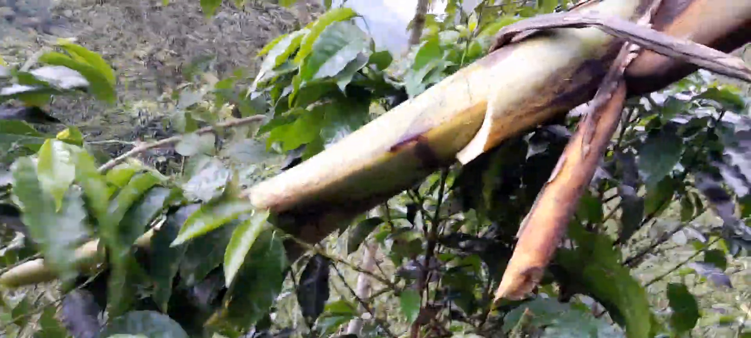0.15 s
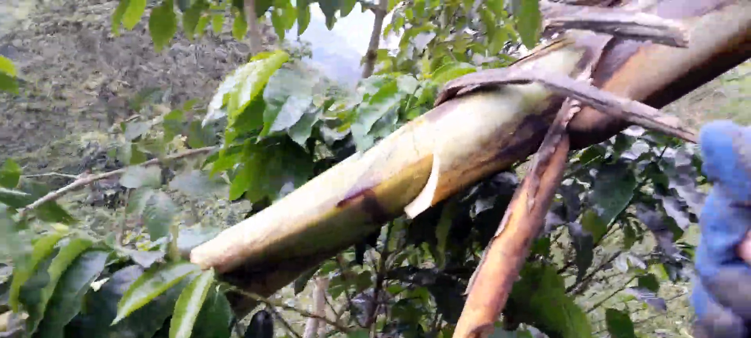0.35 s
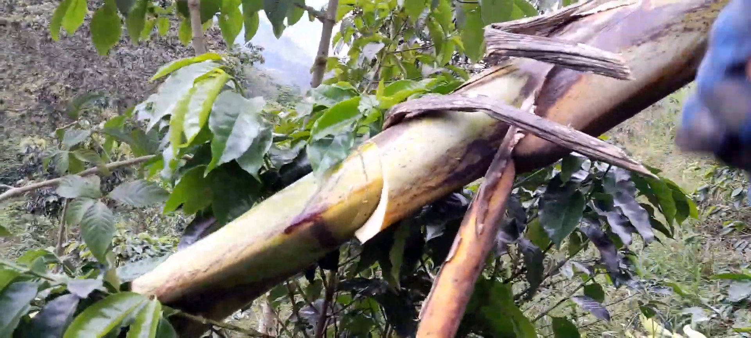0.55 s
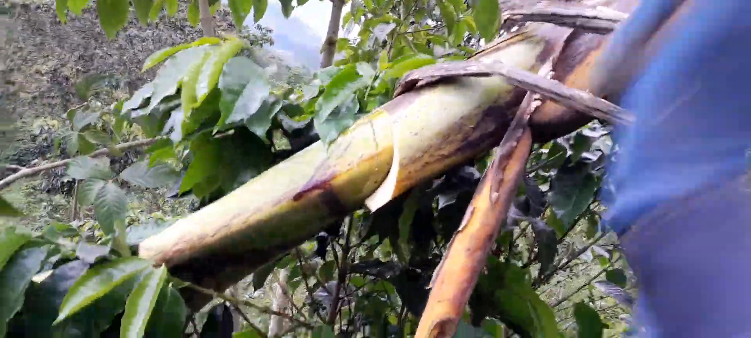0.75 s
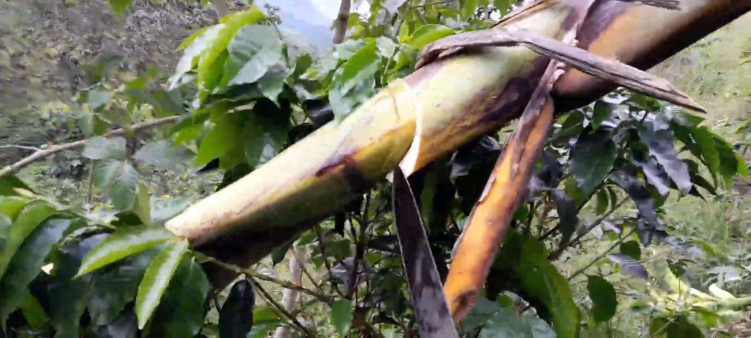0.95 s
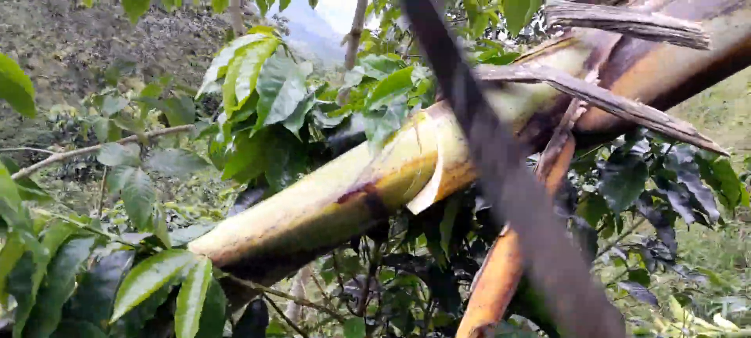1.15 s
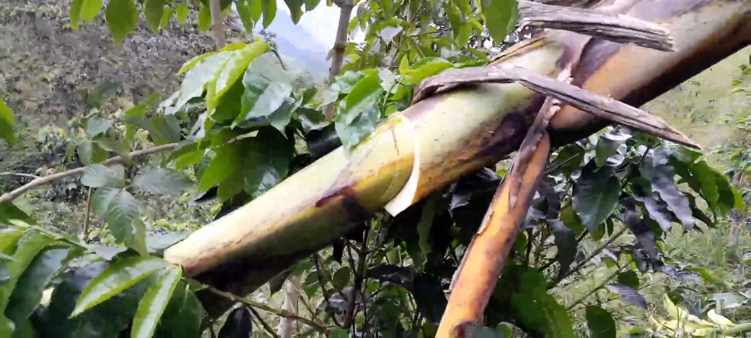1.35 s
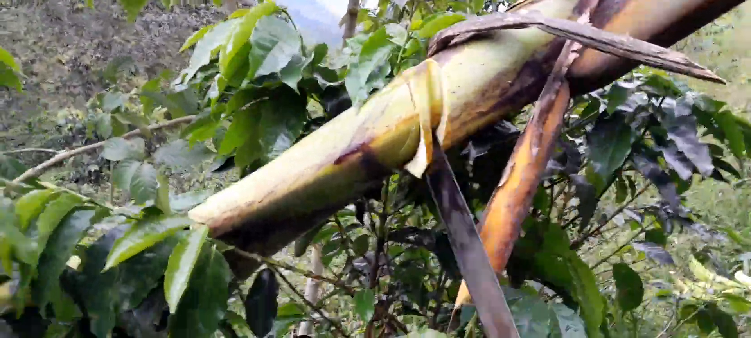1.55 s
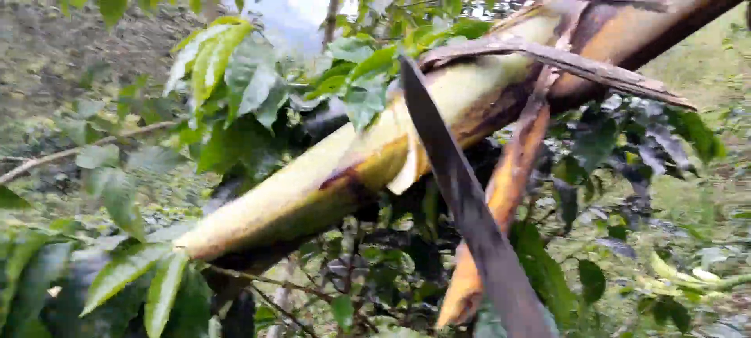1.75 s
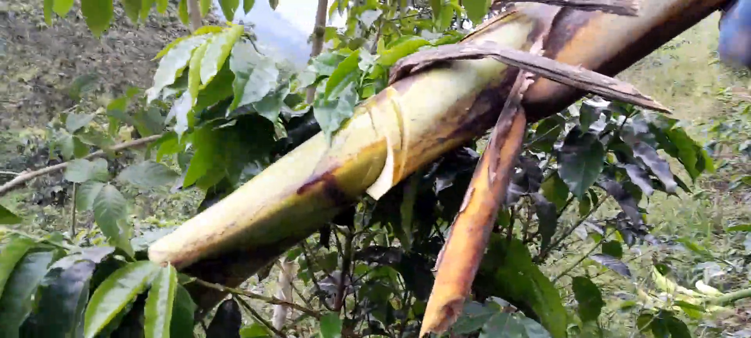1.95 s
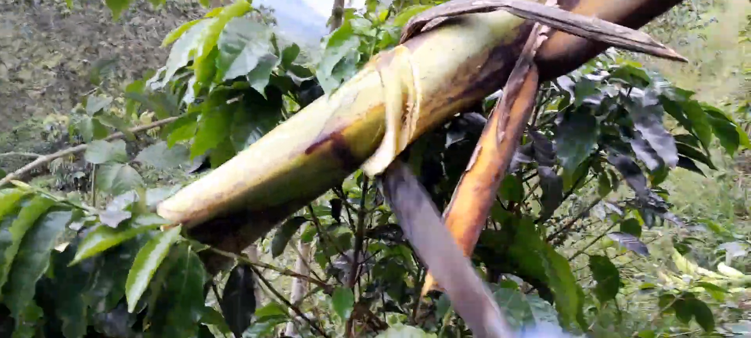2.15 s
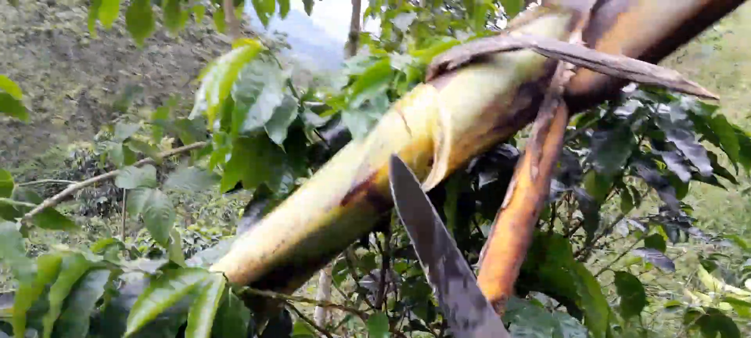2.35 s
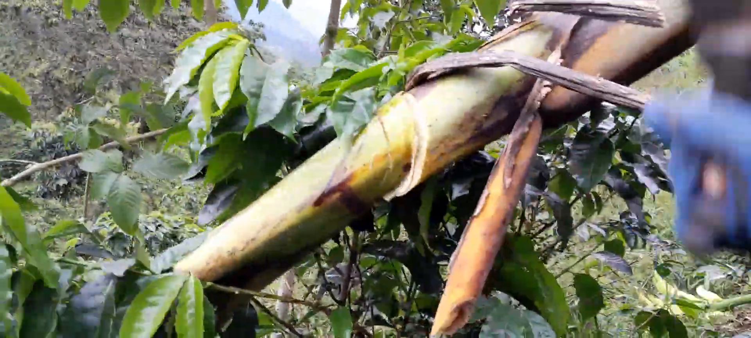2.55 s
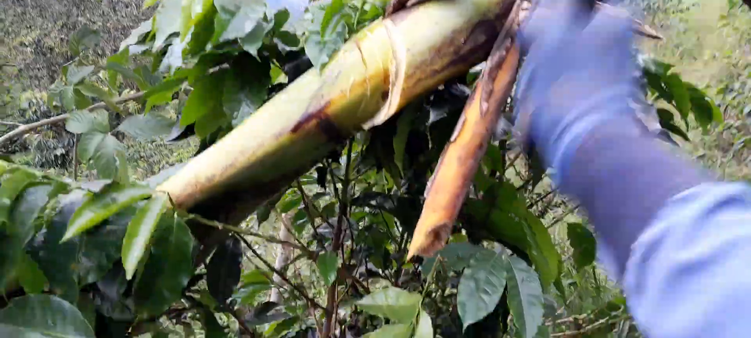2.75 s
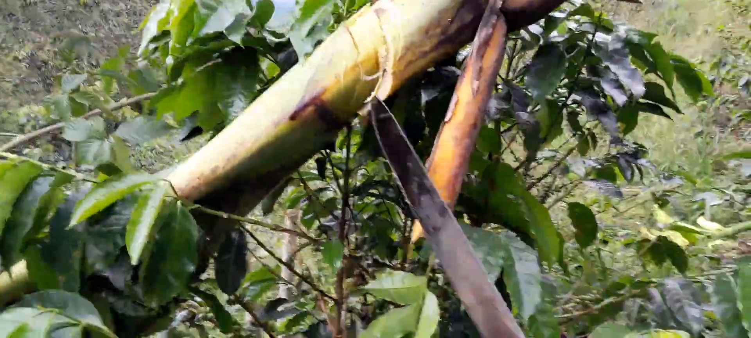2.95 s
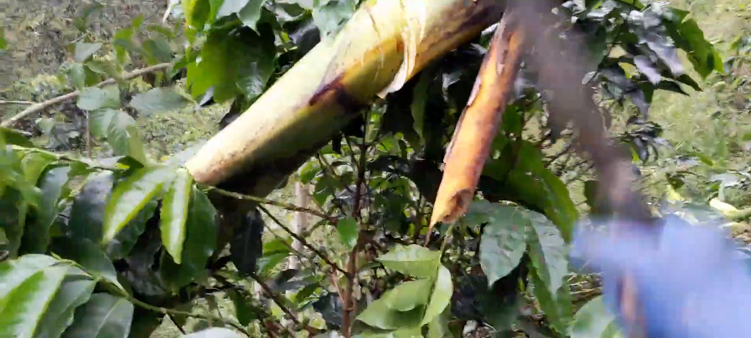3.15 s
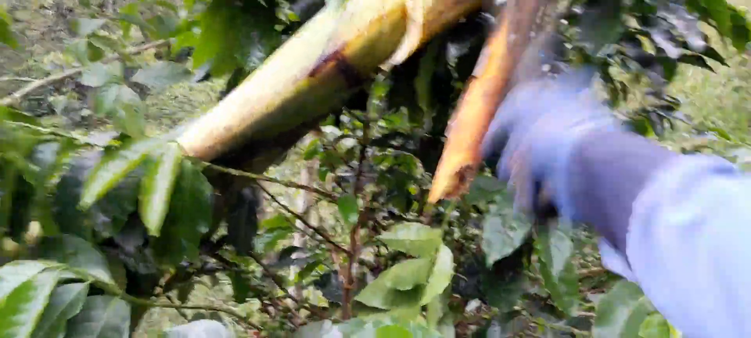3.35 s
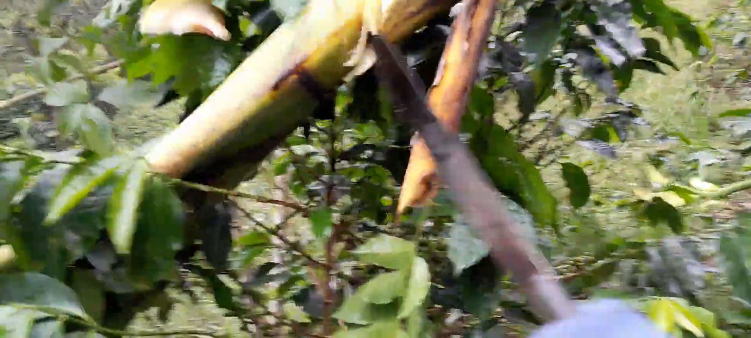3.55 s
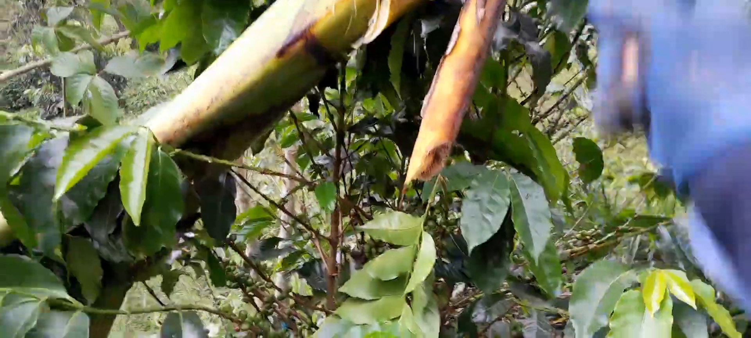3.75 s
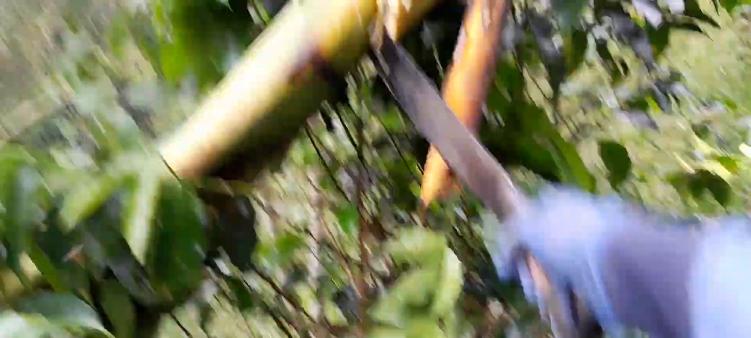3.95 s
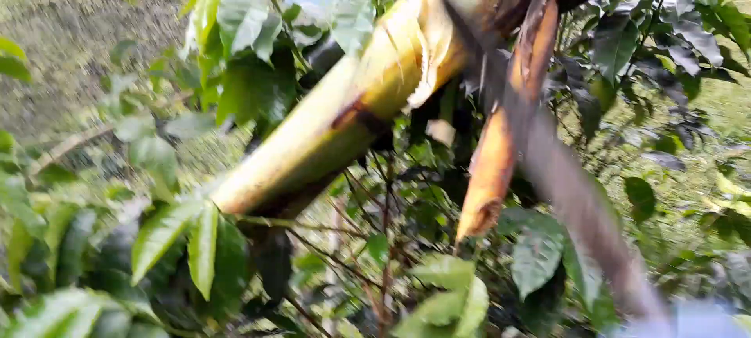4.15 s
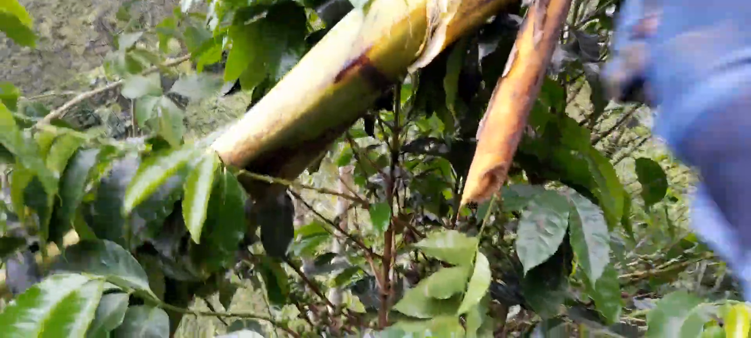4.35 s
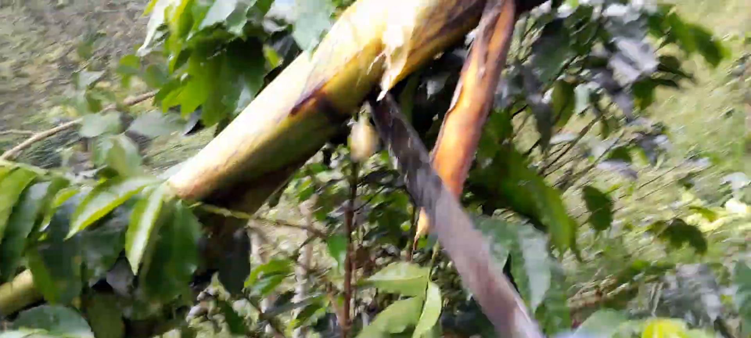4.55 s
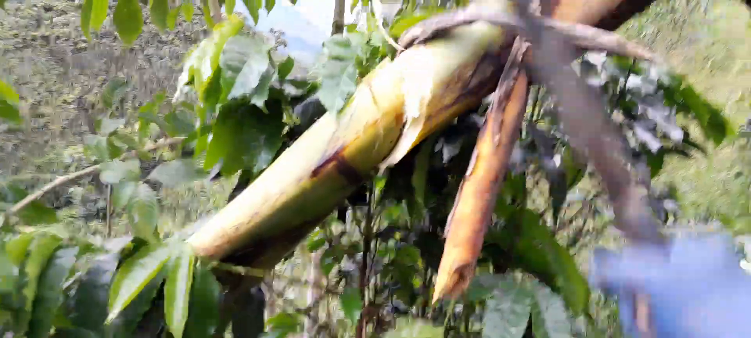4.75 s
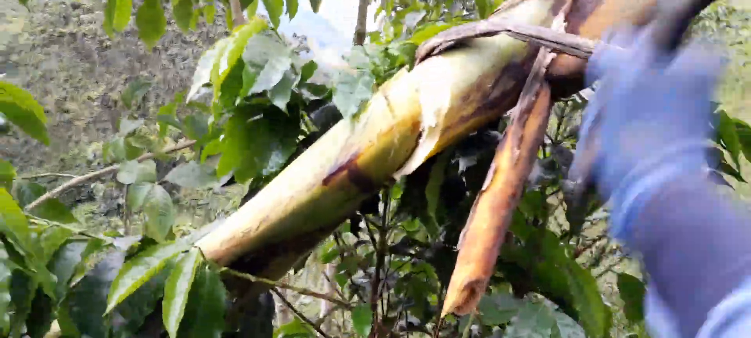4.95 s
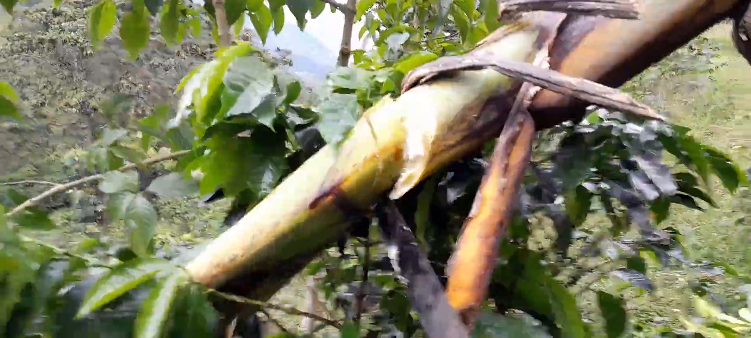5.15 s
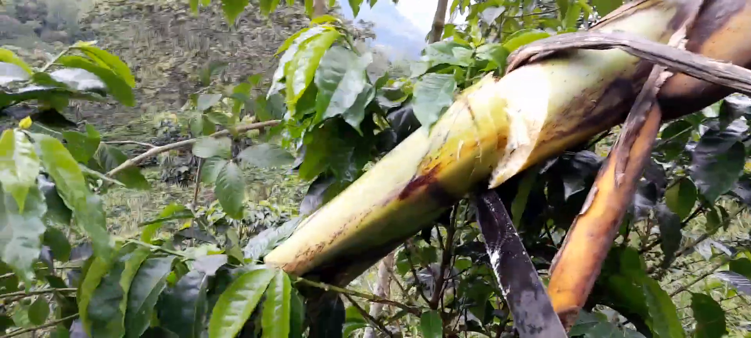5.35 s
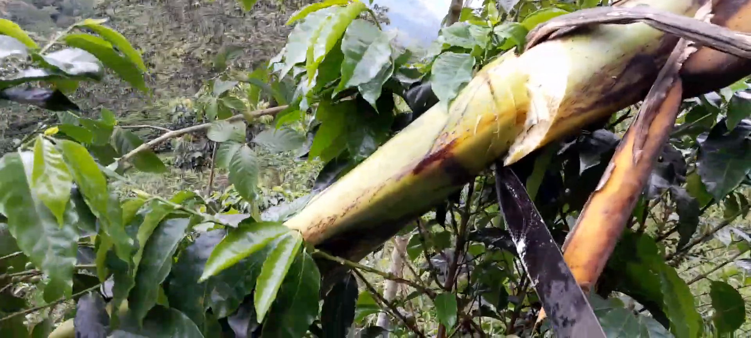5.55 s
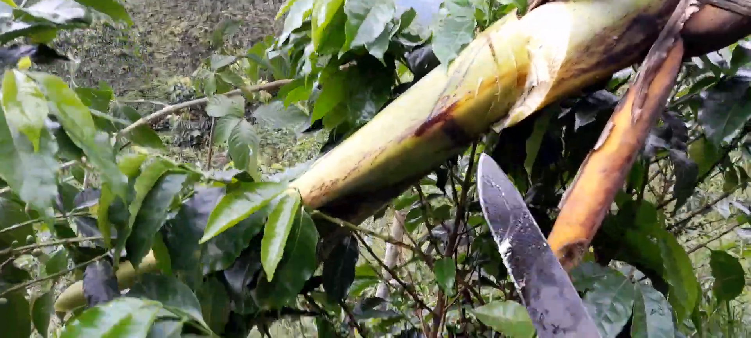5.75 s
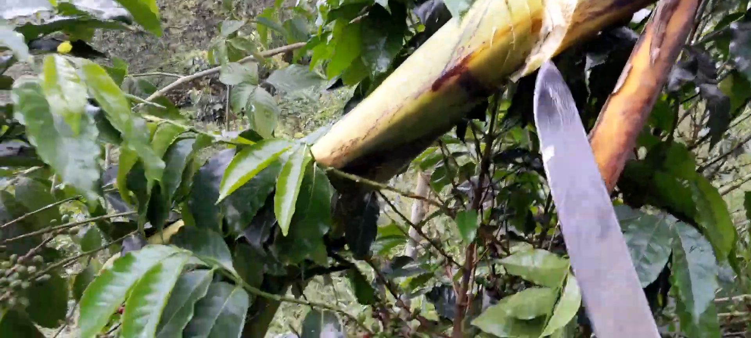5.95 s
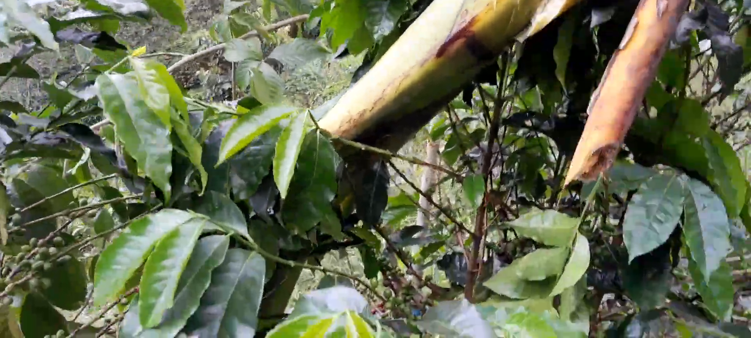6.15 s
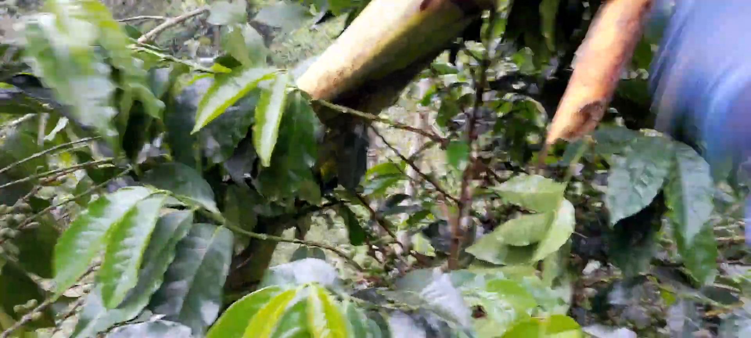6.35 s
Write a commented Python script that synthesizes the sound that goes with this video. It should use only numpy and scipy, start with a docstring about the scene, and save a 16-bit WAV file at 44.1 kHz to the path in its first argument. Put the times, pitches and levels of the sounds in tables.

```python
"""Leafy hillside: a machete chops into the soft, wet trunk of a fallen plant.
Each blow is a short run of tearing noise bursts with resonant tones; fibres snap as damped sines with clicks.
Leaves rustle as ticking hiss, soft thumps swell, some gliding in pitch, and the blade sings once as driven modes.
Behind: wind noise on the microphone ports, a faint hum near 100 Hz with a rough band above, and a far call.
The left port is brighter in leaves and snaps, and lacks bass on near sounds at first.
"""
import sys
import numpy as np
from scipy import signal
from scipy.fft import rfft, irfft
from scipy.io import wavfile
from scipy.ndimage import uniform_filter1d

SR = 44100
rng = np.random.default_rng(int(sys.argv[2]) if len(sys.argv) > 2 else 0)


def unload_wav(signal):
    """Save mono or channel-first audio to the path in sys.argv[1] as 16-bit WAV at rate SR, clipped to [-1, 1]."""
    wavfile.write(
        sys.argv[1],
        SR,
        np.round(np.clip(np.atleast_2d(signal).T, -1, 1) * 32767).astype(np.int16),
    )


N = 282681

LEFT_BASS_CUT_HZ, LEFT_BASS_BACK_S = 270, 4.45   # near sounds on the left port are high-passed until then


def from_db(db):
    """Amplitude gain of a level in dB."""
    return 10 ** (np.asarray(db) / 20)


def rms_one(x):
    """Scale to rms 1."""
    return x / np.sqrt(np.mean(x ** 2) + 1e-20)


def in_time(rows):
    """Curve columns interpolated at every sample; the first column is time in s."""
    time_s, *columns = np.transpose(rows)
    return [np.interp(np.arange(N) / SR, time_s, column) for column in columns]


def at_hz(points, hz):
    """Curve value in dB, interpolated on a log-frequency axis."""
    point_hz, point_db = np.transpose(points)
    return np.interp(np.log(hz), np.log(point_hz), point_db)


def sides(left_right_db):
    """Left and right gains of constant total power."""
    left_power = 1 / (1 + from_db(-2 * left_right_db))
    return np.sqrt(2 * np.array([left_power, 1 - left_power]))


def by_port(pan_db):
    """Left-right dB at every sample: first value before the left bass is back, second after."""
    change_s = [LEFT_BASS_BACK_S - .04, LEFT_BASS_BACK_S + .04]
    return np.interp(np.arange(N) / SR, change_s, pan_db)


def drift(rate_hz):
    """Slow random curve of rms 1: noise through a double pole, computed every 40 samples."""
    pole = np.exp(-80 * np.pi * rate_hz / SR)
    white = rng.standard_normal(N // 40 + 2002)
    slow = signal.lfilter([1], [1, -2 * pole, pole * pole], white)[2000:]   # settled part
    return np.interp(np.arange(N) / 40, np.arange(len(slow)), rms_one(slow))


def coloured(white, gain_db_at):
    """Noise given a spectrum, rms 1."""
    size = white.shape[-1]
    hz = np.maximum(np.fft.rfftfreq(size, 1 / SR), 10)
    return rms_one(irfft(rfft(white) * from_db(gain_db_at(hz)), size))


def resonance(x, hz, width_hz):
    """Two-pole resonance, about unit gain at its peak."""
    r = np.exp(-np.pi * width_hz / SR)
    poles = [1, -2 * r * np.cos(2 * np.pi * hz / SR), r * r]
    return signal.lfilter([(1 - r * r) / 2, 0, (r * r - 1) / 2], poles, x)


def resonance_twice(x, hz, width_hz):
    """Two equal resonances in series: steeper skirts; width_hz is that of each."""
    return resonance(resonance(x, hz, width_hz), hz, width_hz)


# hum: time_s, level_db
HUM_LEVEL = [(0, -67.5), (0.45, -82), (0.7, -64), (1.1, -68), (1.5, -72), (1.8, -61.5), (2.1, -59),
             (2.3, -62), (2.55, -49), (2.8, -59.5), (3.1, -60), (3.35, -70.5), (3.7, -68), (3.95, -63),
             (4.2, -65.5), (4.5, -49), (4.9, -44.5), (5.2, -53.5), (5.65, -51.5), (6.1, -48.5), (6.3, -60),
             (6.41, -53)]
HUM_HZ, SAG_FROM_S, SAG_HZ_PER_S = 107.1, 1.6, 1.3
HUM_WAVER_HZ, OCTAVE_DB, HUM_PAN_DB = 0.46, -21, (-9, 11.5)


def hum():
    """A near-sine with a weak octave; it wavers and sags slowly in pitch."""
    level_db, = in_time(HUM_LEVEL)
    hz = HUM_HZ - SAG_HZ_PER_S * np.maximum(np.arange(N) / SR - SAG_FROM_S, 0)
    phase = 2 * np.pi * np.cumsum(hz + HUM_WAVER_HZ * drift(3.4)) / SR
    tone = np.sqrt(2) * (np.sin(phase) + from_db(OCTAVE_DB) * np.sin(2 * phase))
    return tone * from_db(level_db + 0.5 * drift(6.9)) * sides(by_port(HUM_PAN_DB))


# rough low band: time_s, level_db, centre_hz
DRONE_BAND = [(0, -71, 344.5), (0.8, -68, 358), (1.05, -62, 321.7), (1.52, -64, 366.3), (1.64, -54, 366.3),
              (1.75, -65.5, 330), (2.05, -70, 300), (2.25, -60.5, 370), (2.44, -54, 300.2),
              (2.9, -57, 360.1), (3.25, -65.5, 334), (3.65, -55.5, 320.2), (3.92, -62.5, 353),
              (4.12, -57, 325), (4.4, -63.5, 342.5), (4.73, -50, 262.3), (4.94, -52.5, 269.3),
              (5.04, -53, 335), (5.3, -60.5, 263.6), (5.8, -57.5, 259.3), (6.41, -51, 275)]
DRONE_LUMPS_DB, DRONE_PAN_DB = 3.45, (6, 13)


def drone():
    """Slow noise on a moving carrier: a lumpy band, partly alike at both ports."""
    level_db, centre_hz = in_time(DRONE_BAND)
    white = rng.standard_normal((2, 3, N))   # cosine and sine parts; shared, left, right
    shared, own = white[:, :1], white[:, 1:]
    core = signal.butter(2, 55, fs=SR, output="sos")
    skirts = signal.butter(1, 300, fs=SR, output="sos")
    slow = signal.sosfilt(core, shared + 0.72 * own)
    slow += from_db(-10) * signal.sosfilt(skirts, own)
    turn = 2 * np.pi * np.cumsum(centre_hz) / SR
    band = rms_one(slow[0] * np.cos(turn) + slow[1] * np.sin(turn))
    return band * from_db(level_db + DRONE_LUMPS_DB * drift(3)) * sides(by_port(DRONE_PAN_DB))


# faint airy calls far off, perhaps a bird: start_s, length_s, level_db
FAR_CALLS = [(0.437, 0.28, -67.5), (1.7, 0.19, -66), (2.966, 0.3, -61)]
CALL_HZ, CALL_WIDTH_HZ, CALL_PAN_DB = 1670, 260, 18


def far_call():
    """Narrow-band noise under a smooth swell."""
    swell = np.zeros(N)
    for start_s, length_s, level_db in FAR_CALLS:
        size = round(length_s * SR)
        swell[round(start_s * SR):][:size] = from_db(level_db) * np.sqrt(2 * np.hanning(size))
    air = rms_one(resonance_twice(rng.standard_normal(N), CALL_HZ, CALL_WIDTH_HZ))
    return swell * air * sides(CALL_PAN_DB)[:, None]


# wind on the ports: time_s, level_db (before WIND_GAIN_DB)
WIND_LEVEL = [(0, -86), (0.87, -75), (0.96, -64), (1.21, -85), (1.55, -74), (1.69, -55.5), (1.78, -72),
              (2.5, -69), (2.78, -82), (2.87, -59), (2.97, -71), (3.37, -82), (3.87, -71), (4.37, -63.5),
              (4.53, -51.5), (4.75, -46), (4.84, -59), (4.96, -46.5), (5.03, -55), (5.14, -43), (5.25, -52),
              (5.37, -65), (5.62, -57.5), (5.86, -59), (5.95, -65), (6.05, -55), (6.41, -62.5)]
# wind spectrum: freq_hz, density_db (relative)
WIND_SPECTRUM = [(25, -49), (45, -7), (70, -2), (100, -7.5), (150, -20), (300, -33), (600, -65.5)]
WIND_GAIN_DB, WIND_LUMPS_DB, WIND_PAN_DB, WIND_PAN_DRIFT_DB = 8, 0.55, (-22, 15), 3.8


def wind():
    """Wind buffets the ports: lumpy low noise, its own at each."""
    level_db, = in_time(WIND_LEVEL)
    pan_db = by_port(WIND_PAN_DB) + WIND_PAN_DRIFT_DB * drift(3.2)   # balance wanders between ports
    lumps = from_db(WIND_LUMPS_DB * np.array([drift(8.3), drift(3.3)]))
    noise = coloured(rng.standard_normal((2, N)), lambda hz: at_hz(WIND_SPECTRUM, hz))
    return noise * lumps * from_db(level_db + WIND_GAIN_DB) * sides(pan_db)


# leaves brushed: peak_s, level_db, treble_rel_db, fall_10db_ms
LEAF_BRUSHES = [(0.02, -54.5, 1, 390), (0.11, -53, 0.5, 140), (0.505, -55.5, 3.5, 77),
                (0.87, -57, -0.5, 180), (1.121, -53, -2, 64), (1.45, -57.5, 10, 66), (1.55, -53, -1.5, 170),
                (1.863, -58, 9, 8.4), (1.914, -66, 18, 21), (2.19, -61, 6, 240), (2.38, -50.5, 4, 62),
                (2.428, -43.5, -1, 100), (2.61, -54.5, 3.5, 130), (2.84, -50, 0.5, 143),
                (3.1, -49.5, -10, 65), (3.586, -60, 17, 24.7), (3.661, -48, 3, 11), (3.68, -50, -2, 14),
                (3.771, -53.5, 0.5, 115), (4.147, -49.5, 5, 19), (4.179, -50, 6.5, 15), (4.2, -52, 3, 19),
                (4.292, -53.5, 5, 74), (4.424, -54.5, 6.5, 61.6), (4.707, -63.5, 14.5, 33),
                (4.812, -60.5, 16.5, 12), (4.94, -52.5, -13, 64.6), (5.04, -56.5, 6.5, 47),
                (5.214, -46.5, 0, 77), (5.32, -48.5, 2, 93), (5.396, -54.5, 10, 35),
                (5.462, -49, 12.5, 8.7), (5.49, -54.5, 2, 70), (5.605, -50, 3.5, 32), (5.697, -57, -4, 79),
                (5.851, -61.5, 10, 37), (6.052, -59, -4, 40.4), (6.29, -64, 15.5, 10), (6.395, -66, 9, 30)]
BRUSH_RISE_SHARE = 0.75   # rise time / fall time
STILL_DB, STILL_TREBLE_DB = -62, -1   # at rest
SHAKE_FALL_DB_PER_S, SHAKE_TREBLE_DB = 42.5, 1   # after each blow


def rustle_db():
    """Lower and upper leaf hiss levels: rest, fading shake after each blow and brushes, summed in power."""
    t = np.arange(0, N, 64) / SR

    def two_bands(treble_db):
        return np.array([[0], [treble_db]])

    power = from_db(2 * (STILL_DB + two_bands(STILL_TREBLE_DB))) + 0 * t
    for start_s, *_, shake_db in CHOPS:
        fading_db = shake_db - SHAKE_FALL_DB_PER_S * np.abs(t - start_s)
        power += (t > start_s) * from_db(2 * (fading_db + two_bands(SHAKE_TREBLE_DB)))
    for peak_s, level_db, treble_db, fall_ms in LEAF_BRUSHES:
        away_s = np.maximum(t - peak_s, (peak_s - t) / BRUSH_RISE_SHARE)
        power += from_db(2 * (level_db - 10000 * away_s / fall_ms + two_bands(treble_db)))
    return [np.interp(np.arange(N) / SR, t, 10 * np.log10(p)) for p in power]


# leaf hiss spectrum: freq_hz, density_db (relative)
LEAF_SPECTRUM = [(150, -8), (290, -14), (460, -8.5), (900, -11), (1250, -13), (1650, -11), (2040, -12),
                 (6000, -16.5), (7800, -14), (9500, -21), (13000, -20.5), (15700, -22.5), (16000, -45)]
# diffuse sound at the ports: freq_hz, left_right_db
DIFFUSE_BALANCE = [(200, 6.5), (400, 7.5), (700, 16), (1500, 15.5), (3000, 15), (5000, 11.5), (8500, 18.5),
                   (11000, 12), (15000, 10)]
LEAF_SPLIT_HZ, LEAF_GAIN_DB = 4500, 2   # gain on top of the rustle levels


def leaves(patchy_db, shared_db, ticks_per_s, ticks_db):
    """Hiss with small ticks, unrelated at the two ports; ticks come thicker when the leaves move."""
    low_db, high_db = rustle_db()
    hz = np.maximum(np.fft.rfftfreq(N, 1 / SR), 10)
    rate_per_s = ticks_per_s * from_db(.6 * (low_db - STILL_DB))   # ticks_per_s holds at rest
    strength_db = ticks_db + 3.5 * np.minimum(rng.exponential(1, N), 3)
    ticks = (rng.random(N) < rate_per_s / SR) * from_db(strength_db)
    grains = 1 + signal.lfilter([1], [1, -.975], ticks)   # each tick lifts the hiss for about 1 ms
    noise = coloured(rng.standard_normal((2, N)) * grains, lambda f: at_hz(LEAF_SPECTRUM, f))
    hiss = rfft(noise) * sides(at_hz(DIFFUSE_BALANCE, hz))
    upper = 1 / (1 + (LEAF_SPLIT_HZ / hz) ** 2)
    low, high = irfft(hiss * (1 - upper), N), irfft(hiss * upper, N)
    low *= from_db(low_db + patchy_db * drift(18))
    high *= from_db(high_db + 0.53 * patchy_db * drift(14))
    return from_db(LEAF_GAIN_DB + shared_db * drift(34)) * (low + high)


# soft thumps, from the trunk under a blow or a gust on one port:
# start_s, peak_db, first_hz, last_hz, left_right_db, length_ms
SOFT_THUMPS = [(0.902, -35, 248, 254, 1, 31), (1.588, -35, 415, 395, -7, 20),
               (1.648, -32, 117, 102, -41, 28.6), (1.671, -30, 100.5, 55, -35, 40),
               (2.219, -50, 316, 330, 2, 29), (2.874, -46, 280, 280, -2, 53),
               (3.436, -35, 287, 287, -5, 23), (3.44, -43, 70.4, 50, -16, 41),
               (3.975, -50, 237, 233, -13, 42), (4.499, -35, 345.8, 344, 6, 25.8),
               (4.641, -29.5, 78, 61.5, 25, 80), (4.901, -44, 59.74, 59.1, 6, 106),
               (5.086, -29.5, 390, 376, 11, 21.3), (5.11, -21.5, 98, 65, 26, 61)]


def thumps():
    """A few cycles under a smooth swell, some gliding in pitch, others steady, in step at both ports."""
    out = np.zeros((2, N))
    for start_s, peak_db, first_hz, last_hz, pan_db, length_ms in SOFT_THUMPS:
        size = round(length_ms / 1000 * SR)
        phase = 2 * np.pi * np.cumsum(np.linspace(first_hz, last_hz, size)) / SR
        pulse = np.cos(phase - phase[size // 2]) * np.hanning(size)
        at = round(start_s * SR)
        out[:, at:at + size] += from_db(peak_db) * sides(pan_db)[:, None] * pulse
    return out


# modes of the blade: freq_hz, width_hz, level_db (relative)
BLADE_MODES = [(4170, 28, -11.5), (4860, 25, 4), (5250, 32, -4), (5700, 30, 1), (6070, 33, -3),
               (7140, 30, -15), (7700, 31, 0), (8230, 39, -4.5), (8810, 36, -8), (9400, 50, -6)]
# blade slides free: time_s, level_db (relative)
BLADE_SLIDE = [(3.545, -25), (3.565, -3), (3.595, -6), (3.605, -10), (3.64, -30)]
BLADE_PAN_DB = 21


def blade(level_db):
    """Friction noise keeps the steel's modes ringing while the blade slides free."""
    t = np.arange(N) / SR
    slide = from_db(in_time(BLADE_SLIDE)[0])
    slide = slide * (t > BLADE_SLIDE[0][0]) * (t < BLADE_SLIDE[-1][0])
    modes = np.zeros(N)
    for hz, width_hz, mode_db in BLADE_MODES:
        modes += from_db(mode_db) * rms_one(resonance(rng.standard_normal(N), hz, width_hz))
    return from_db(level_db) * slide * modes * sides(BLADE_PAN_DB)[:, None]


# fibres and twigs that snap: start_s, ring_peak_db, pitch_hz, t60_ms
FIBRE_SNAPS = [(0.105, -39.5, 2780, 11.4), (0.7628, -33.5, 2350, 13), (0.9473, -33, 6000, 10),
               (0.9592, -36, 910, 10.5), (1.708, -34.5, 8000, 13), (1.851, -51, 1770, 10),
               (2.324, -34.5, 7550, 14), (2.332, -35, 2890, 11), (2.3402, -35, 2760, 13),
               (2.358, -32, 1290, 14), (2.3712, -34, 2400, 10.6), (2.39, -29, 1500, 9.2),
               (2.407, -39, 3000, 20), (2.4155, -33.5, 2240, 10), (2.4264, -24, 970, 10),
               (2.4344, -34, 3700, 13), (2.4602, -31, 1210, 14), (2.491, -37.5, 8800, 10),
               (2.6209, -37, 2805, 12.5), (3.0679, -45, 1490, 14), (3.6546, -39.5, 1490, 13),
               (3.6874, -46, 5900, 8), (3.71, -42, 1670, 17), (3.7683, -44, 3170, 8.3),
               (4.0136, -30, 1620, 11.4), (4.1411, -36, 3700, 13), (4.173, -43, 2870, 8.9),
               (4.238, -44.5, 6500, 8), (4.705, -50, 5600, 120), (4.7901, -40.5, 1860, 12),
               (4.9106, -38, 1900, 35), (4.9594, -40.5, 2800, 15), (5.1983, -36, 1232, 11),
               (5.231, -38, 4044, 9.3), (5.2606, -38, 2200, 9.7), (5.2697, -33, 2400, 13),
               (5.278, -45, 3800, 12), (5.2876, -32, 2070, 12), (5.3014, -31, 1970, 12.5),
               (5.3307, -34.5, 3340, 12), (5.384, -27, 1850, 11.4), (5.4599, -28.5, 1698, 21),
               (5.5942, -41, 3254, 14), (6.0515, -46, 7870, 12), (6.3752, -43, 790, 14)]
SNAP_PAN_DB = 24
CLICK_DB, PUFF_DB = -3, -6   # against a ring of t60 12 ms
PURER_DB_PER_MS = 2.3   # longer rings carry less click and puff


def snaps(above, spread):
    """Each snap: a short ring at its own pitch, a hard broad click and a puff of leaf noise."""
    size = 4096
    out = np.zeros((2, N + size))
    t = np.arange(size) / SR
    for start_s, level_db, pitch_hz, t60_ms in FIBRE_SNAPS:
        click_db, puff_db = np.array([CLICK_DB, PUFF_DB]) - PURER_DB_PER_MS * (t60_ms - 12)
        dying = from_db(-60000 * t / t60_ms)
        ring = np.sin(2 * np.pi * pitch_hz * t) * dying

        def puff_spectrum(f):
            slope_db = np.where(f < pitch_hz, 12.5, 3.5)   # per octave away from the pitch
            return at_hz(TEAR_SPECTRUM, f) - slope_db * np.abs(np.log2(f / pitch_hz))

        puff = coloured(rng.standard_normal((2, size)), puff_spectrum) * dying ** 0.4
        click_hz = min(above * pitch_hz, 9000)   # the break is far more damped than the ring
        click = resonance_twice(1. * (t == 0), click_hz, spread * click_hz)
        sound = ring + from_db(click_db) * click / click.max() + from_db(puff_db) * puff
        at = round(start_s * SR)
        out[:, at:at + size] += from_db(level_db) * sides(SNAP_PAN_DB)[:, None] * sound
    return out[:, :N]


# tearing noise spectrum: freq_hz, density_db (relative)
TEAR_SPECTRUM = [(88, -53), (150, 5), (1260, 1.5), (2810, -3.5), (3420, -5), (5150, -4.5), (6260, -11),
                 (7620, -6.5), (9440, -14), (12900, -14.5), (16000, -20)]
# right port on blows: freq_hz, gain_db (relative)
RIGHT_PORT_SPECTRUM = [(200, -16.5), (500, 2), (1500, -4), (4000, -2), (9000, -2), (12000, 1), (16000, 2)]
# blows, a first burst (mostly leaning right), then a second leaning left:
# start_s, first_db, first_t60_ms, first_knock_hz, second_delay_ms, second_db,
# second_rise_ms, second_t60_ms, second_knock_hz, tilt_db_per_octave, leaf_shake_db
CHOPS = [(0.9, -20, 29, 394, 6.0, -19, 3.1, 69, 930, 0.05, -46),
         (1.5864, -21, 56, 470, 8.2, -14.5, 1.1, 58, 1550, 2.5, -43),
         (2.2128, -26.5, 31, 820, 10.4, -18, 0.44, 65, 840, 1.7, -42),
         (2.8727, -22.5, 56, 730, 7.2, -18, 3.8, 76, 950, 1.4, -46),
         (3.431, -24, 64, 426, 8.0, -20.5, 1.3, 104, 820, 1.8, -46.5),
         (3.97, -28, 59, 440, 4.7, -25.5, 7.2, 37, 1327, 1.5, -47),
         (4.492, -25, 7.8, 3000, 4.0, -10.5, 2.76, 25, 1490, 2.5, -48.5),
         (5.083, -12, 68, 2010, 12, -15, 4.8, 25, 2580, 2.34, -49.5)]
# edge tears on within a blow: start_s, level_db, left_right_db, t60_ms, tilt_db_per_octave, knock_hz
TEARS_ON = [(2.218, -19, -10, 39, 1.5, 930), (3.455, -22.5, 27, 30, 5, 1020),
            (3.984, -23.5, 16, 66, 1.6, 1030), (4.508, -22.5, 15, 53, 0.5, 517),
            (4.517, -24, 19, 16.5, 5, 735)]
# short pitched tones swelling up just ahead of or within the blows:
# start_s, level_db, pitch_hz, width_hz, rise_ms, t60_ms
PITCHED_TONES = [(0.894, -34, 1440, 120, 7.1, 31), (1.584, -17, 1450, 111, 6.6, 18),
                 (1.585, -34, 1740, 200, 2.9, 30), (2.2245, -20.5, 1730, 600, 0.93, 54),
                 (2.868, -23, 776, 89, 19.5, 7.3), (2.869, -28, 1520, 160, 22, 21),
                 (3.427, -23.5, 2490, 150, 6, 64), (3.429, -20.5, 4680, 249.5, 2.9, 57),
                 (3.436, -31.5, 3200, 250, 4.6, 110), (3.439, -29, 4300, 200, 4, 63),
                 (4.4971, -16, 4500, 900, 4.7, 7.2), (5.084, -16.5, 3990, 900, 2.5, 14),
                 (5.085, -20.5, 940, 500, 2.1, 27)]
# *_KNOCK_DB against its tear, TRUNK_DB (low thud) against the first burst
FIRST_RISE_MS, FIRST_KNOCK_DB, FIRST_PAN_DB = 2.4, -11, (-17, 20)   # pan before, after left bass is back
TRUNK_HZ, TRUNK_WIDTH_HZ, TRUNK_DB, TRUNK_RISE_MS, TRUNK_PAN_DB = 268, 200, -18.5, 8.6, -3.5
SECOND_KNOCK_DB, SECOND_PAN_DB = -15.5, 17
LATE_RISE_MS, LATE_KNOCK_DB = 1.4, -6.5
TONE_PAN_DB, KNOCK_WIDTH_SHARE = 17, 0.61   # share: width / pitch


def blows(crackle_db, alike, tail_db, tail_t60_ms):
    """The edge tears wet fibres: crackling noise that swells and dies, plus a knock of the trunk."""
    size = 16384
    out = np.zeros((2, N))
    ms = np.arange(size) / SR * 1000

    def add(start_s, tear_db, knock_db, pan_db, rise_ms, t60_ms, tilt, knock_hz, width_hz):
        """Add one burst: a tear and a resonance driven by the same noise."""
        white = rng.standard_normal((3, size))
        white = np.sqrt(alike) * white[0] + np.sqrt(1 - alike) * white[1:]
        uneven = 4 * uniform_filter1d(rng.standard_normal(size), size=16)   # spread about 1
        white *= from_db(crackle_db * uneven)   # fibres part unevenly

        def left_spectrum(hz):
            return at_hz(TEAR_SPECTRUM, hz) + tilt * np.log2(hz / 3000)

        def right_spectrum(hz):
            return left_spectrum(hz) + at_hz(RIGHT_PORT_SPECTRUM, hz)

        tear = np.array([coloured(white[0], left_spectrum), coloured(white[1], right_spectrum)])
        knock = rms_one(resonance_twice(white, knock_hz, width_hz))
        after_ms = np.maximum(ms - rise_ms, 0)
        swell = np.minimum(ms / rise_ms, 1) ** 0.5
        body = from_db(-60 * after_ms / t60_ms)
        tail = from_db(tail_db - 60 * after_ms / tail_t60_ms)   # foliage scatters a tail
        envelope = swell * body
        # equal knock energy at each port before panning
        knock *= np.linalg.norm(envelope) / np.linalg.norm(envelope * knock, axis=1)[:, None]
        burst = from_db(tear_db) * tear * swell * (body + tail) + from_db(knock_db) * knock * envelope
        at = round(start_s * SR)
        out[:, at:at + size] += sides(pan_db)[:, None] * burst

    for start_s, db, t60_ms, hz, delay_ms, second_db, rise_ms, second_t60_ms, second_hz, tilt, _ in CHOPS:
        first_pan_db = FIRST_PAN_DB[start_s > LEFT_BASS_BACK_S]
        add(start_s, db, db + FIRST_KNOCK_DB, first_pan_db, FIRST_RISE_MS, t60_ms, tilt,
            hz, KNOCK_WIDTH_SHARE * hz)
        add(start_s, -np.inf, db + TRUNK_DB, TRUNK_PAN_DB, TRUNK_RISE_MS, t60_ms, 0,
            TRUNK_HZ, TRUNK_WIDTH_HZ)
        add(start_s + delay_ms / 1000, second_db, second_db + SECOND_KNOCK_DB, SECOND_PAN_DB, rise_ms,
            second_t60_ms, tilt, second_hz, KNOCK_WIDTH_SHARE * second_hz)
    for start_s, db, pan_db, t60_ms, tilt, hz in TEARS_ON:
        add(start_s, db, db + LATE_KNOCK_DB, pan_db, LATE_RISE_MS, t60_ms, tilt,
            hz, KNOCK_WIDTH_SHARE * hz)
    for start_s, db, hz, width_hz, rise_ms, t60_ms in PITCHED_TONES:
        add(start_s, -np.inf, db, TONE_PAN_DB, rise_ms, t60_ms, 0, hz, width_hz)
    return out


def scene():
    """Hum, drone, far call, wind and thumps behind the near leaves, blade, snaps and blows."""
    far = hum() + drone() + far_call() + wind()
    near = leaves(patchy_db=0.55, shared_db=1.6, ticks_per_s=45, ticks_db=-5)
    near += blade(level_db=-51)
    near += snaps(above=1.2, spread=0.99)
    near += blows(crackle_db=0.75, alike=0.45, tail_db=-37, tail_t60_ms=640)
    bass_cut = signal.butter(4, LEFT_BASS_CUT_HZ, "high", fs=SR, output="sos")
    thin = signal.sosfilt(bass_cut, near[0])
    near[0] = np.where(np.arange(N) < LEFT_BASS_BACK_S * SR, thin, near[0])
    return far + thumps() + near


CLIP_PEAK, STOPBAND_HZ, STOPBAND_DB = 0.86, 16800, 85


def record(dry):
    """Clip peaks under full scale, then low-pass steeply."""
    clipped = np.clip(dry, -CLIP_PEAK, CLIP_PEAK)
    low_pass = signal.cheby2(20, STOPBAND_DB, STOPBAND_HZ, fs=SR, output="sos")
    return signal.sosfilt(low_pass, clipped)


dry = scene()
out = record(dry)
unload_wav(out)
```